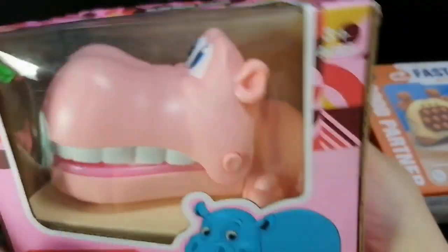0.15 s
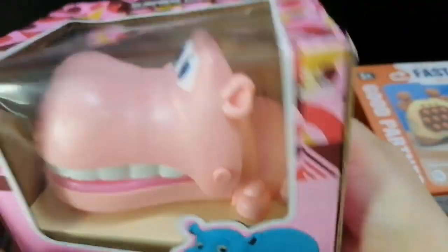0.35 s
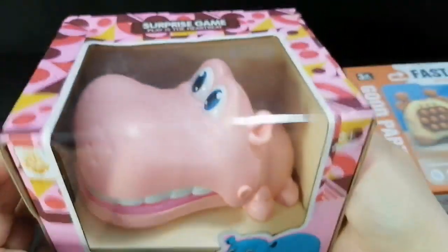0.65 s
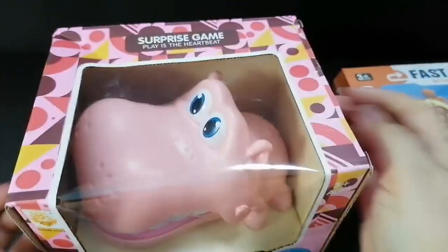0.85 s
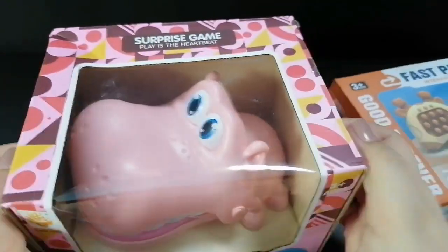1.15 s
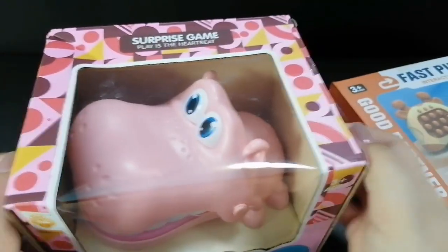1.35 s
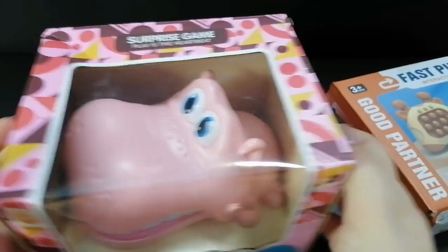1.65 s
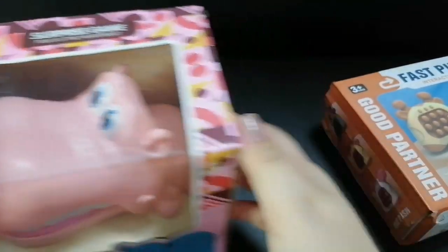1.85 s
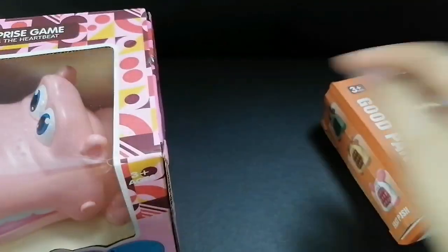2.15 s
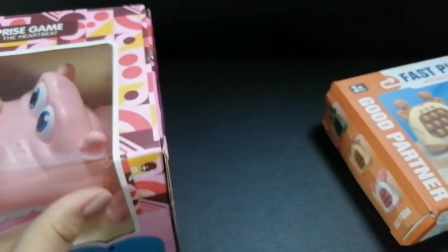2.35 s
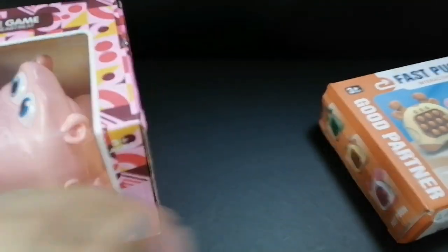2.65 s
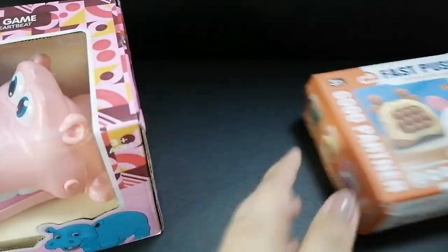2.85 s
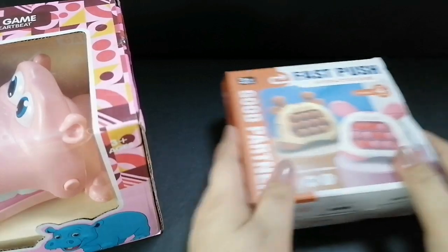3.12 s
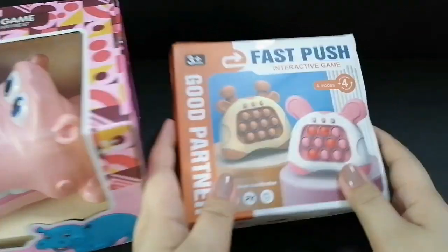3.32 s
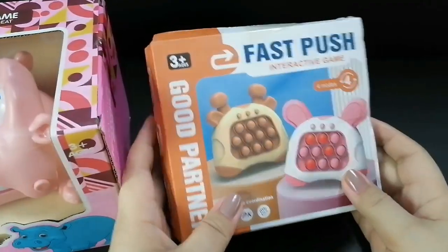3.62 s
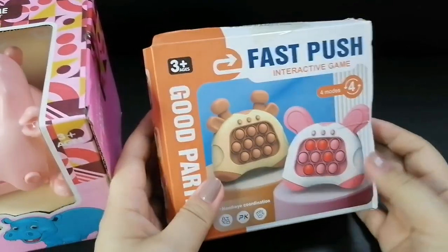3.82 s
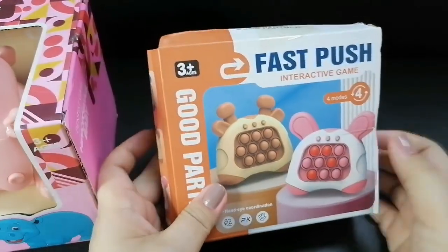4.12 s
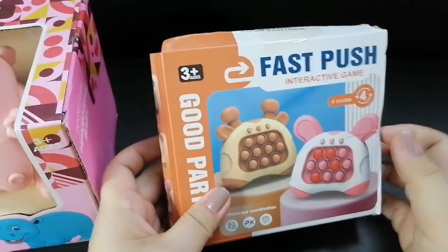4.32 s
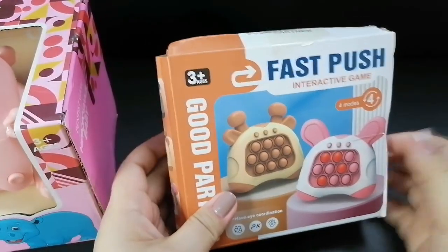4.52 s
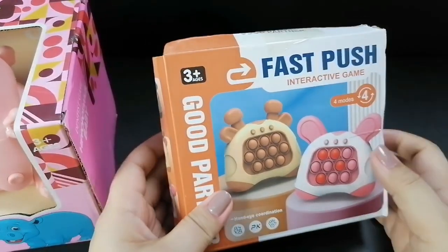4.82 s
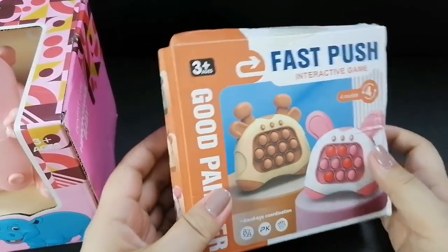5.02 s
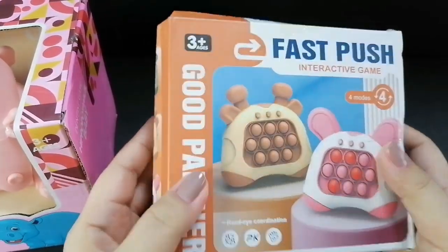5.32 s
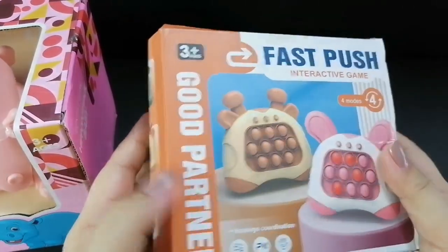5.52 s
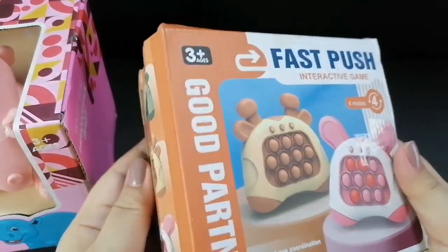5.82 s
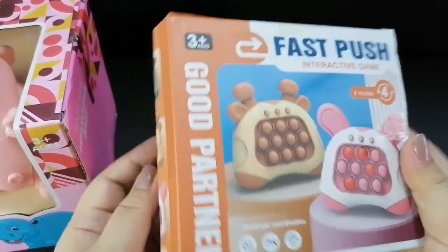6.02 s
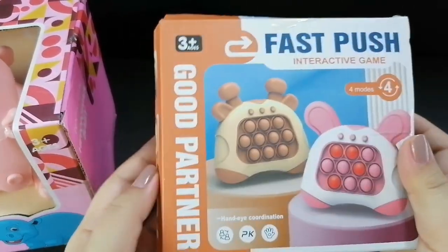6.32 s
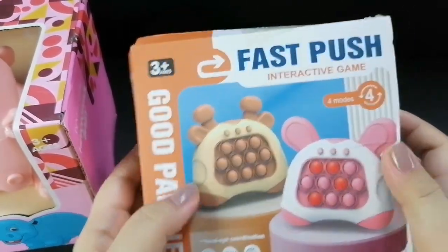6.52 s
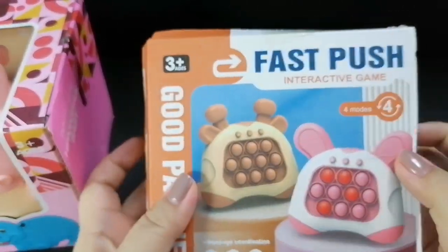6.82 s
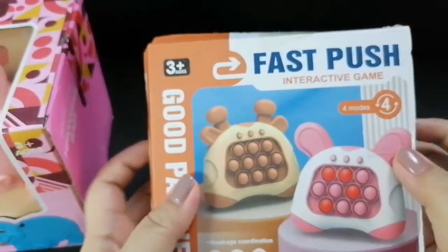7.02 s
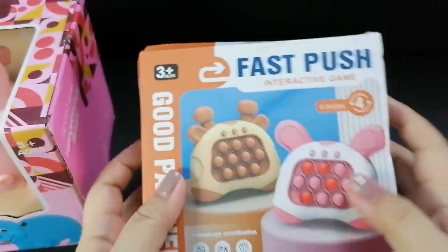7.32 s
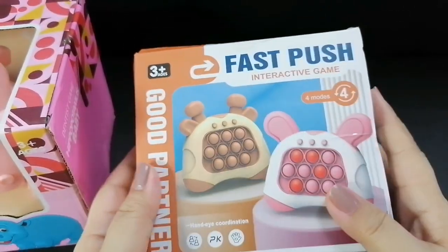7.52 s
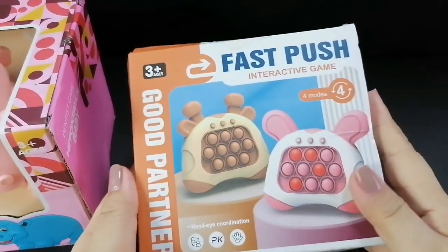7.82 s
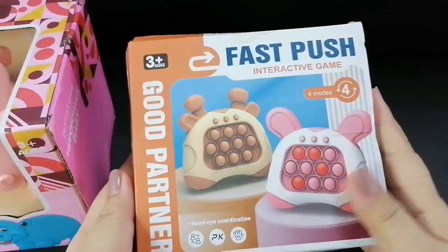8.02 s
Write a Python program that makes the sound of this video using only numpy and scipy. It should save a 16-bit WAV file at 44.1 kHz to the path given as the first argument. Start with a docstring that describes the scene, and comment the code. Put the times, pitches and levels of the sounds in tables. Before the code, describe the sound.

A dense flurry of nail clicks and hollow cardboard knocks lasts about a second and a half, then gives way to quiet hand rustling and board scraping. Sparse firm taps on a smaller, tighter box follow, separated by gentle handling and dull low presses, ending with several crisp taps on its front face. Everything is intimate and close to the stereo microphone, with a short dry room tail, faint air noise and a distant appliance hum.

```python
"""A quiet room, a stereo microphone close to two small cardboard boxes, fingernails drumming on them.
First come rolls on the big box: noise clicks over decaying board modes, with a short room tail.
About two seconds in, the hands slide and rustle (shaped noise) and move to the small box for faint touches.
Firmer taps follow on its side; after more rustling, the last few land on its front face.
Soft room noise and a low wavering hum lie underneath throughout."""
import sys
import numpy as np
from scipy import signal
from scipy.fft import rfft, irfft, next_fast_len
from scipy.io import wavfile
from scipy.ndimage import uniform_filter1d, map_coordinates

SR = 44100
rng = np.random.default_rng(int(sys.argv[2]) if len(sys.argv) > 2 else 0)


def unload_wav(signal):
    """Save mono or channel-first audio to the path in sys.argv[1] as 16-bit WAV at rate SR, clipped to [-1, 1]."""
    wavfile.write(
        sys.argv[1],
        SR,
        np.round(np.clip(np.atleast_2d(signal).T, -1, 1) * 32767).astype(np.int16),
    )


N = 359856  # samples


def amp(db):
    """Decibels to linear amplitude."""
    return 10 ** (np.asarray(db) / 20)


def unit(x):
    """Scale to an rms of 1."""
    return x / np.sqrt(np.mean(x ** 2) + 1e-20)


def along(points, hz):
    """Read a curve of (hz, value) points on a log frequency axis."""
    f, v = np.transpose(points)
    return np.interp(np.log(hz + 1), np.log(f + 1), v)


def wobble(rate):
    """A smooth random curve with rate knots a second."""
    knots = rng.standard_normal(int(N * rate / SR) + 4)
    return map_coordinates(knots, [np.arange(N) * rate / SR])


def filtered(x, response):
    """Shape the spectrum of x by a response of frequency."""
    m = next_fast_len(x.shape[-1] + 8192)
    return irfft(rfft(x, m) * response(np.fft.rfftfreq(m, 1 / SR)), m)[..., :x.shape[-1]]


def rush(spectrum, alike, grain_db, patchy_db):
    """Stereo noise of rms 1: grain_db makes short bursts stand out, patchy_db lets narrow bands come and go."""
    z = signal.stft(rng.standard_normal((2, N)), nperseg=512)[2]
    field = uniform_filter1d(rng.standard_normal(z.shape[1:]), size=4, axis=0)
    field = uniform_filter1d(field, size=9, axis=1)
    patchy = signal.istft(z * amp(patchy_db * unit(field)), nperseg=512)[1][:, :N]
    pair = patchy * amp(grain_db * wobble(400))
    # the angle between mid and side sets how alike left and right are
    turn = lambda hz: np.arccos(np.clip(along(alike, hz), -1, 1)) / 2
    mid, side = filtered(pair, lambda hz: amp(along(spectrum, hz)) * [np.cos(turn(hz)), np.sin(turn(hz))])
    return unit(np.array([mid + side, mid - side]))


def plateau(start, length, rise, fall):
    """0 dB while a movement lasts, with a sloped rise before and fall after, in dB a second."""
    t = np.arange(N) / SR
    return -rise * np.maximum(start - t, 0) - fall * np.maximum(t - start - length, 0)


SWAP_S, FRONT_S = 2.8, 5.5  # the hands move to the small box, then the fingers go round to its front face
# Nail and finger contacts: start_s, knock_db, click_db (over the knock), edge_db (over the panel),
# left_right_db, panel_pitch_hz, edge_pitch_hz
CONTACTS = [(0.238, -32, 4.5, 8, -3, 231, 780), (0.687, -27, -30, -3.5, -3, 370, 660),
            (0.728, -38, 1.5, -5, -4, 260, 866), (0.917, -37, -3, -6, -6, 190, 560),
            (0.925, -21, -7.5, -13, -2, 173, 592), (0.954, -30, -18, -5, 0, 260, 610),
            (0.971, -32, -17, 6, -3, 450, 680), (0.982, -25.5, 1.5, 18, 2.5, 410, 600),
            (0.988, -21, -2.5, 13, -3, 450, 577), (1.0, -32, 3, 3, 2, 450, 516),
            (1.046, -34.5, -5, 14, -5, 413, 627), (1.133, -18, 2.5, 7, -1.5, 383, 600),
            (1.139, -10, -5.5, 0, -3, 371, 698), (1.162, -25.5, -17, -6, -7, 427, 700),
            (1.255, -36, -5, 5, -5, 400, 614), (1.298, -28, -6, 20, -3, 240, 685),
            (1.304, -18.5, -4, -8.5, 5, 250, 645), (1.308, -16.5, -4.5, -4, -10, 260, 610),
            (1.331, -11, -3.5, -0.5, -0.5, 387, 613), (1.337, -20, -4.5, -5, -6, 192, 608),
            (1.372, -30, -11, 3, -2, 408, 605), (1.488, -25, -15, -7, 4, 280, 684),
            (1.492, -15, -5.5, 3.5, -5.5, 280, 675), (1.514, -15.5, -0.5, -2.5, -2, 276, 598),
            (1.671, -14.5, -5.5, 9, -1.5, 300, 650), (1.688, -16, -6.5, 5, -0.5, 265, 597),
            (1.827, -17.5, -7.5, -3.5, -5, 280, 677), (2.029, -51.5, 21.5, -1, -1, 307.5, 1090),
            (2.04, -42.5, 12, 3, 2, 260, 1020), (2.47, -42, 12, -20, 0.5, 156, 585),
            (3.01, -45, -13, -6, -16, 160, 580), (3.156, -33.5, -21, 13, -7, 410, 597),
            (3.219, -41, -12, 7, -7, 350, 700), (3.74, -42, -8, 8, -6, 260, 685),
            (3.773, -44, -4, 5, -3, 342.5, 570), (3.982, -45, -21, 6, -6, 390, 495),
            (3.999, -51.5, 19.5, 8, -5, 290, 590), (4.068, -45.5, 5.5, 7, -3, 240, 784),
            (4.301, -19, -9.5, 5, -5, 357, 499), (4.309, -35, 5, 7, -0.5, 374, 481),
            (4.488, -43.5, 17.5, 18, -2, 360, 683), (4.494, -25.5, 5, 22, -6, 360, 695),
            (4.499, -19.5, -2, -3, -4.5, 358, 492), (4.71, -16.5, -2, -3, 8.5, 325, 670),
            (4.715, -13.5, -2, -1, -0.5, 367, 671), (4.891, -19.5, -42, -1.5, 4, 347, 585),
            (4.897, -32, 6, -15, 4, 350, 590), (4.986, -44.5, 1.5, 0, 1, 221.3, 890),
            (5.886, -47, 13, 15, 0.5, 240, 1250), (6.25, -47.5, 11, 5, 1, 294, 707),
            (6.949, -16.5, -3.5, 1, 4.5, 255, 716), (7.154, -18.5, -6, 3.5, 4.5, 255, 585),
            (7.163, -29.5, 6, -17, 1, 250, 570), (7.332, -27.5, 1, 3, 6.5, 281, 585),
            (7.348, -25.5, -7, 10.5, 3, 259, 592)]


def taps():
    """Each contact is a board ring plus a nail click, reaching the two ports at slightly different times."""
    out, t = np.zeros((2, N + SR)), np.arange(SR // 4) / SR
    for s, db, click_db, edge_db, pan_db, panel_hz, edge_hz in CONTACTS:
        face = int(s > SWAP_S) + int(s > FRONT_S)
        ring = box_ring(t, face, db, edge_db, panel_hz, edge_hz)
        snap = nail_click(t, db)
        sound = ring / np.abs(ring).max() + amp(click_db) * snap / np.abs(snap).max()
        lead = 4 if s < SWAP_S else -2  # half the samples by which the left port hears it first
        for side, sign in enumerate((1, -1)):
            first = round(s * SR) - 20 - sign * lead
            out[side, first:][:len(t)] += amp(db + sign * pan_db / 2) * sound[side]
    return out[:, :N]


FIRM_DB = -17.5  # contacts below this knock level sound softer
PANEL_HZ = 450  # modes from here up belong to the edges and flaps
NEAR_PANEL_DB, NEAR_EDGE_DB = 10, 5.5  # loss per octave away from the struck spot's pitch
UNDER_EDGE_DB = 20.5  # extra loss per octave below the edge pitch
SOFT_DULLS = 0.39  # extra loss above the edge pitch, dB per dB below FIRM_DB at one octave or more
PULL_OCTAVES = .16  # the grip bends modes within about this reach towards the struck spot's pitch
HOLLOW_HZ, HOLLOW_LEAN_DB = 375, 2  # the big box's hollow speaks to the left
# Corner below which each face radiates little: hz for big box, small box side, small box front
FACE_CORNERS = [38.8, 135, 145.6]
# Board modes of the big box: pitch_hz, level_db, t60_s
BIG_BOX_MODES = [(67.4, 11, 0.47), (123, -3, 0.22), (179, 8, 0.1), (256, -2.5, 0.2), (291, 14, 0.053),
                 (358, 6.5, 0.12), (417, 13.5, 0.048), (479.5, -2.5, 0.53), (597, 18, 0.034),
                 (676, 12, 0.036), (894, -2, 0.12), (1080, 12, 0.039), (1446, 13.5, 0.021),
                 (1964, 10.5, 0.026)]
# Board modes of the small box's side: pitch_hz, level_db, t60_s
SMALL_SIDE_MODES = [(303, -1, 0.081), (369, -1.5, 0.074), (400, 11, 0.049), (485, 1.5, 0.12),
                    (640, 11, 0.034), (787, 5, 0.055), (988, 3, 0.068), (1158, 11.5, 0.016),
                    (1406, 3, 0.052), (2070, 4.5, 0.036), (2540, -4, 0.048), (3032, -5, 0.061)]
# Board modes of the small box's front: pitch_hz, level_db, t60_s
SMALL_FRONT_MODES = [(255, -3.5, 0.13), (298, 7.5, 0.044), (360, -2, 0.056), (495, -10, 0.1),
                     (613, -4, 0.065), (726, 2.5, 0.038), (866, -4, 0.038), (1023, -1, 0.056),
                     (1366, 11, 0.02), (1525, 11, 0.0087), (1937, -4, 0.042), (2460, 9, 0.012),
                     (2880, 2, 0.024), (3760, -3, 0.042)]


def box_ring(t, face, db, edge_db, panel_hz, edge_hz):
    """A contact wakes most the panel and edge modes nearest in pitch to the struck spot; they decay as sines."""
    modes = (BIG_BOX_MODES, SMALL_SIDE_MODES, SMALL_FRONT_MODES)[face]
    hz, level, t60 = np.transpose(modes)[..., None]
    # stiff board crowds its upper modes: each has a weaker neighbour
    high = hz[:, 0] > 700
    hz = np.r_[hz, hz[high] * 2 ** rng.uniform(.08, .25, hz[high].shape)]
    level, t60 = np.r_[level, level[high] - 3], np.r_[t60, t60[high]]

    level_luck, lean_luck, pitch_luck, phase_luck = rng.standard_normal((4, len(hz), 1))
    softness = max(FIRM_DB - db, 0)
    edge = hz >= PANEL_HZ
    away = np.log2(hz / np.where(edge, edge_hz, panel_hz))  # octaves
    # soft fingers barely wake the far modes
    edge_near_db = edge_db - NEAR_EDGE_DB * np.minimum(np.abs(away), 1.04 + softness / 9)
    near_db = np.where(edge, edge_near_db, -NEAR_PANEL_DB * np.abs(away))
    dulling_db = UNDER_EDGE_DB * np.maximum(-away - .1, 0) + SOFT_DULLS * softness * np.clip(away, 0, 1)
    near_db = near_db - edge * dulling_db
    hz = hz * 2 ** (-away * np.exp(-(away / PULL_OCTAVES) ** 2))

    # each mode radiates unevenly to the two sides
    hollow = (face == 0) * np.exp(-(np.log2(hz / HOLLOW_HZ) / 0.23) ** 2)
    lean_db = (1.44 * lean_luck + HOLLOW_LEAN_DB * hollow) * [[[1]], [[-1]]]
    # the finger damps the first swings fast
    blow = amp(-60 * t / t60) + 8.0 * amp(-60 * t / (0.74 * t60))
    # uneven board smears each pitch as it rings on
    wander = np.minimum(t / .03, 1) * rng.standard_normal((len(hz), len(t)))
    blur = .004 * np.sqrt(hz) * np.cumsum(wander, axis=1)
    # the grip detunes the board
    swing = np.sin(2 * np.pi * hz * (1 + .008 * pitch_luck) * t + blur + .25 * phase_luck)
    ring = (amp(level + near_db + 1.02 * level_luck + lean_db) * blow * swing).sum(1)
    # gentle contacts bite more slowly
    ring = ring * (1 - np.exp(-t / (.0009 * amp(-(db + 15) / 3))))

    # the loose toy inside knocks back: sparse, fading and duller
    jolts = rng.standard_normal(len(t)) * (rng.random(len(t)) < 500 / SR) * amp(-17 - 60 * t / .14)
    rattle = signal.fftconvolve(ring, jolts[None], axes=1)[:, :len(t)]
    ring = ring + filtered(rattle, lambda f: 900 / (900 + 1j * f))
    return filtered(ring, lambda f: (1j * f / (FACE_CORNERS[face] + 1j * f)) ** 2)


SOFTER_DB_PER_OCTAVE = 9  # below FIRM_DB, the click's low cut rises an octave per this many dB
# Nail click spectrum: pitch_hz, density_db (per Hz)
CLICK_SPECTRUM = [(880, 3), (1500, -3.5), (3000, -6), (7000, -9), (12000, -22), (16500, -14.5)]


def nail_click(t, db):
    """A noise spike and a short hiss; gentler contacts start more slowly and click thinner."""
    crack = amp(-60 * t / .013) + .16 * amp(-60 * t / .12)
    onset = 1 - np.exp(-t / (0.00026 * amp(-(db + 17) / 2)))
    snap = rng.standard_normal((2, len(t))) * crack * onset
    thin_hz = 600 * 2 ** (max(FIRM_DB - db, 0) / SOFTER_DB_PER_OCTAVE)
    return filtered(snap, lambda f: amp(along(CLICK_SPECTRUM, f)) * 1j * f / (thin_hz + 1j * f))


PORT_LAG = 24  # samples by which low pushes reach the left port late
# Soft pushes and set-downs that flex a panel: start_s, level_db, pitch_hz, t60_s
PUSHES = [(0.688, -36, 60.4, 0.2), (0.79, -43, 135, 0.068), (0.94, -40, 75, 0.3),
          (2.912, -40, 220.5, 0.077), (3.151, -36, 170, 0.067), (3.657, -33.5, 213, 0.078),
          (6.99, -34.5, 200, 0.11), (1.3, -25, 93, 0.07), (2.2, -50, 118, 0.05), (3.631, -34.5, 62, 0.11),
          (5.1, -39, 197, 0.072), (4.891, -30, 107, 0.084), (6.097, -38, 225.4, 0.19),
          (6.132, -34.5, 206, 0.098), (7.861, -32.5, 203, 0.11), (7.935, -36, 217, 0.1)]


def presses():
    """A soft push swells one low mode, a decaying sine without a click."""
    out, t = np.zeros(N + SR), np.arange(SR // 3) / SR
    for s, db, hz, t60 in PUSHES:
        swell = amp(db - 60 * t / t60) * (1 - np.exp(-t / 0.0072))
        out[round(s * SR):][:len(t)] += swell * np.sin(2 * np.pi * hz * t)
    return np.array([amp(-4.5) * out[:N], amp(2.6) * out[PORT_LAG:][:N]])


# Short finger scuffs: middle_s, length_s, level_db, centre_hz, width_octaves, left_right_db
FINGER_SCUFFS = [(0.21, 0.055, -47.5, 8500, 1, -3), (0.74, 0.083, -48, 800, 0.79, -3),
                 (1.028, 0.1, -46, 810, 0.96, -2), (5.005, 0.12, -56.5, 820, 1, 0),
                 (0.57, 0.11, -53.5, 578, 0.19, 1), (2.242, 0.027, -52.5, 5100, 1, 6),
                 (2.477, 0.02, -42, 560, 0.46, 2), (4.616, 0.22, -55.5, 1080, 0.6, 0),
                 (4.635, 0.096, -61, 2580, 0.46, 10.5), (5.451, 0.03, -52.5, 3500, 0.24, 1),
                 (6.705, 0.06, -58.5, 2150, 1, 0), (7.422, .16, -63, 1700, 1, 2),
                 (5.879, 0.033, -61, 1200, 0.08, 2), (2.014, 0.0027, -42, 7000, 0.95, 2),
                 (3.15, 0.027, -48, 610, .5, -6), (3.072, 0.076, -56.5, 3100, 0.17, -7),
                 (3.322, 0.25, -62, 2950, 0.17, -12), (5.926, 0.1, -53, 9000, 1, 7),
                 (7.873, 0.055, -59, 680, 0.17, 4)]


def scuffs():
    """A fingertip drags briefly: grainy noise in one band that swells and fades."""
    out, t = np.zeros((2, N + SR)), np.arange(SR // 2) / SR - .25
    for s, length, db, hz, octaves, pan_db in FINGER_SCUFFS:
        # grains of a millisecond or two
        grain_db = 3.5 * np.repeat(rng.standard_normal(len(t)), SR // 600)[:len(t)]
        grit = rng.standard_normal((3, len(t))) * amp(grain_db)
        # one shared noise plus one for each side
        bell = lambda f: np.exp(-(np.log2((f + 1) / hz) / octaves) ** 2)
        band = unit(filtered(grit[1:] + grit[0], bell))
        swell = amp([[db + pan_db / 2], [db - pan_db / 2]]) * np.exp(-(2 * t / length) ** 2)
        out[:, round(s * SR):][:, :len(t)] += band * swell
    return out[:, SR // 4:][:, :N]


GRIP_SKIN_DB, GRIP_BOARD_DB = -62.5, -64.5  # the fingers shift a little on a held box
STILL_DB, SETTLE_DB_PER_S = -4.5, 173  # how far the grip noise drops at rest, and the slope steepness
# The gripping hand rests: start_s, end_s
GRIP_RESTS = [(1.45, 2.4), (2.3, 2.5), (4.28, 4.5), (7.05, 8.44)]
# Hands and boxes slide: start_s, length_s, rise_db_per_s, fall_db_per_s, skin_db, board_db, left_right_db
HAND_SLIDES = [(0.174, 0.07, 121, 200, -52.5, -53.5, -3), (0.58, 0.095, 56, 300, -48.5, -60.5, -6),
               (0.911, 0.04, 148, 192, -50, -51.5, -3), (1.897, 0.017, 159, 137, -51.5, -49.5, -3),
               (1.997, 0.23, 80, 211, -51, -64.5, -1), (3.037, 0.3, 170, 71, -45.5, -78, -7.5),
               (3.114, 0.13, 148, 150, -68, -57.5, -5.5), (3.82, 0.14, 98, 193, -59.5, -77, -3.5),
               (5.418, 0.088, 108, 145, -54, -61, 0), (5.735, 0.31, 150, 182, -60, -90, 2),
               (6.519, 0.2, 150, 190, -61, -90, 3), (6.965, 0.033, 152, 190, -57, -69, -6),
               (7.49, 0.073, 152, 190, -59.5, -66.5, 2), (7.834, 0.16, 142, 190, -61, -63, 2)]
# Skin rustle spectrum: pitch_hz, density_db (per Hz)
SKIN_SPECTRUM = [(880, -20), (1800, -19.5), (3000, -10), (5000, -9.5), (7300, -5.5), (12000, -13.5),
                 (15800, -9.5)]
# Board scrape spectrum: pitch_hz, density_db (per Hz)
BOARD_SPECTRUM = [(35, -69), (60, -18), (160, -3.5), (463, -8), (568, -5), (695, -8), (1750, -18),
                  (2500, -18), (3250, -24), (5500, -120)]


def handling():
    """Skin rustles over the glossy faces and the board scrapes on the table: two patchy noises."""
    still = sum(amp(plateau(a, b - a, SETTLE_DB_PER_S, SETTLE_DB_PER_S)) for a, b in GRIP_RESTS)
    grip = amp(STILL_DB * np.minimum(still, 1)) ** 2
    skin_power = amp(GRIP_SKIN_DB) ** 2 * grip * np.ones((2, 1))
    board_power = amp(GRIP_BOARD_DB) ** 2 * grip * np.ones((2, 1))
    for s, length, rise, fall, skin_db, board_db, pan_db in HAND_SLIDES:
        sides_db = np.array([[pan_db / 2], [-pan_db / 2]])
        shape = amp(plateau(s, length, rise, fall) + sides_db) ** 2
        skin_power = skin_power + amp(skin_db) ** 2 * shape
        board_power = board_power + amp(board_db) ** 2 * shape
    skin_uneven_db = 1.2 * wobble(70) + .7 * wobble(12)
    skin = rush(SKIN_SPECTRUM, [(2000, 0.04), (10000, 0.018)], grain_db=0.55, patchy_db=2.5)
    skin = amp(skin_uneven_db) * skin
    board_uneven_db = 2.8 * wobble(30) + 1.5 * wobble(8)
    board = rush(BOARD_SPECTRUM, [(100, 0.71), (2000, 0.027)], grain_db=1.0, patchy_db=2.5)
    board = amp(board_uneven_db) * board
    return np.sqrt(skin_power) * skin + np.sqrt(board_power) * board


# Decay of the room: pitch_hz, t60_s
ROOM_DECAY = [(100, 0.15), (700, 0.19), (2000, 0.25), (5000, 0.25), (12000, 0.19)]


def room(x):
    """Each frequency of the room's answer dies at its own speed; the tail is new every third of a second."""
    out, step = np.zeros((2, N + SR)), SR // 3
    for i in range(0, N, step):
        hz, t, z = signal.stft(rng.standard_normal((2, step)), SR, nperseg=256)
        alike = 1 / (1 + (hz[:, None] / 900) ** 2)  # long waves reach both ports alike
        z[1] = alike * z[0] + np.sqrt(1 - alike ** 2) * z[1]
        decay = amp(-60 * t / along(ROOM_DECAY, hz)[:, None])
        tail = signal.istft(z * decay, SR, nperseg=256)[1]
        wet = signal.fftconvolve(x[:, i:i + step], tail / np.linalg.norm(tail[0]), axes=1)
        out[:, i + 200:][:, :wet.shape[1]] += wet  # the answer starts 200 samples late
    return out[:, :N]


AIR_DB = -58  # room noise level before its slow drift
# Room noise spectrum: pitch_hz, density_db (per Hz)
AIR_SPECTRUM = [(25, 8.5), (70, -0.5), (150, -4.5), (291, -2.5), (500, -15.5), (800, -16), (1700, -27.5),
                (2800, -23.5), (5000, -22), (7400, -16), (10800, -36), (15800, -54)]
# Likeness of room noise at the two ports: pitch_hz, correlation (no unit)
AIR_LIKENESS = [(60, .8), (250, .75), (1000, .3), (4000, .05), (15000, .05)]
# Partials of the hum: pitch_hz, level_db, waver_db
HUM_PARTIALS = [(59, -72.5, 3), (119, -61.5, 1), (226, -72, 2.5), (297, -68.5, 2)]


def background():
    """Drifting room noise and the hum of a distant appliance, sines that waver in pitch and level."""
    drift_db = 1.8 * wobble(2.4)
    sound = amp(AIR_DB + drift_db) * rush(AIR_SPECTRUM, AIR_LIKENESS, grain_db=0.5, patchy_db=1.1)
    for hz, db, waver_db in HUM_PARTIALS:
        level = amp(db + waver_db * wobble(5.5))
        turns = np.cumsum(hz * (1 + 0.00594 * wobble(5.2))) / SR
        sound = sound + level * np.sin(2 * np.pi * turns)
    return sound


def scene():
    """Knocks with their room tail, over handling and the quiet room."""
    knocks = taps() + presses() + scuffs()
    return knocks + amp(-7.5) * room(knocks) + handling() + background()


TOP_HZ = 15800  # nothing is kept from here up
# Capsule and housing colour: pitch_hz, level_db
MIC_COLOUR = [(2200, -0.5), (3000, 1.5), (4000, -6.5), (5300, 1.5), (6200, -2.5), (6800, 0), (7300, 5),
              (7900, -1), (8600, -3.5), (11000, -5.5), (14700, -8), (15800, -12)]


def record(dry):
    """Microphone colour and bass roll-off, gain control that ducks after loud knocks, then the band limit."""
    # the right port is brighter
    tilt_db = lambda hz: .5 * np.log2((hz + 200) / 2000) * np.array([[-.8], [.8]])
    bass_cut = lambda hz: (1j * hz / (45 + 1j * hz)) ** 2
    heard = filtered(dry, lambda hz: bass_cut(hz) * amp(along(MIC_COLOUR, hz) + tilt_db(hz)))
    keep = np.exp(-1 / (.12 * SR))  # the meter forgets within about a tenth of a second
    power = signal.lfilter([1 - keep], [1, -keep], (heard ** 2).mean(0))
    ducked = heard * (1 + power / amp(-38.0) ** 2) ** -.1
    return filtered(ducked, lambda hz: hz < TOP_HZ)


dry = scene()
out = record(dry)
unload_wav(out)
```